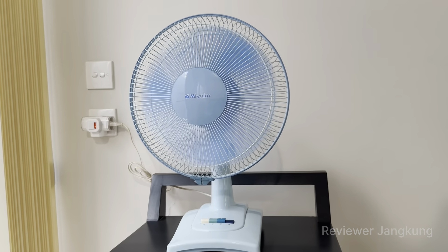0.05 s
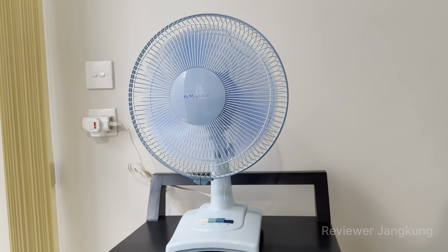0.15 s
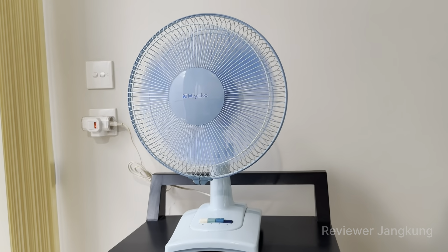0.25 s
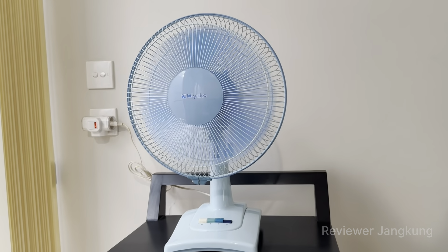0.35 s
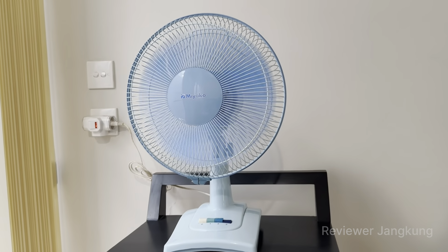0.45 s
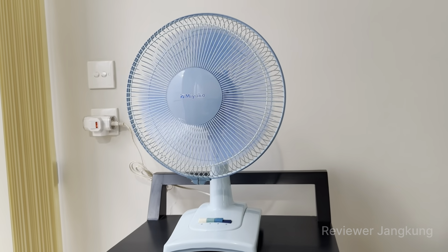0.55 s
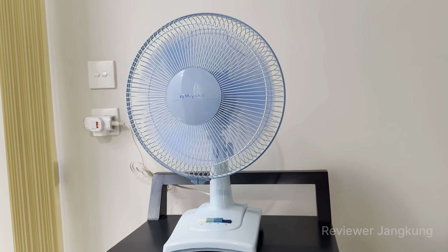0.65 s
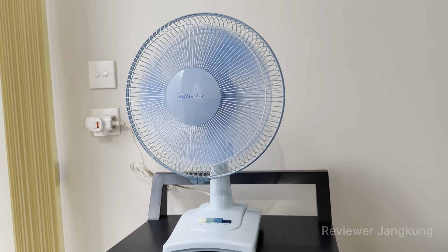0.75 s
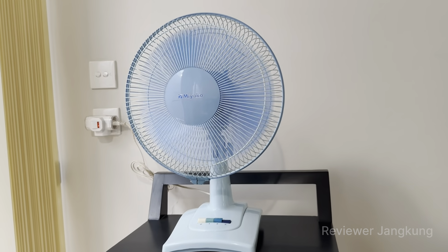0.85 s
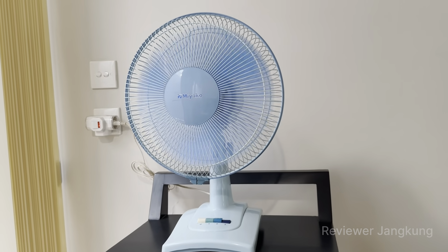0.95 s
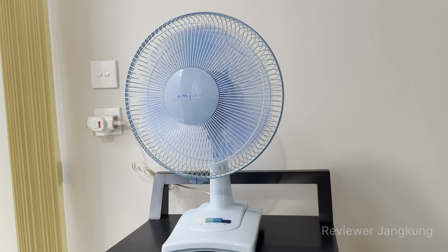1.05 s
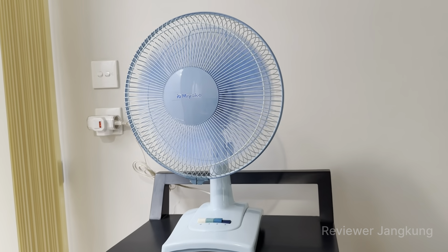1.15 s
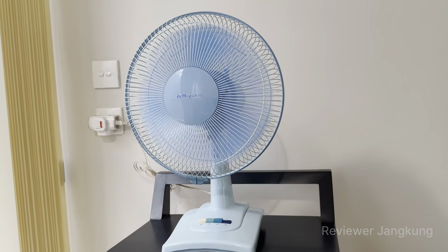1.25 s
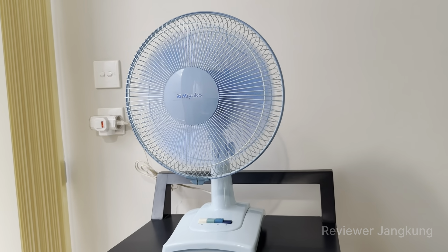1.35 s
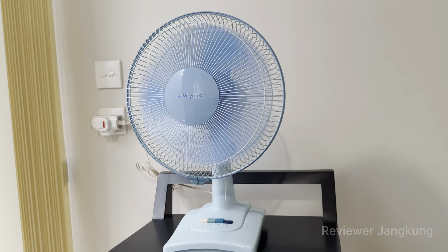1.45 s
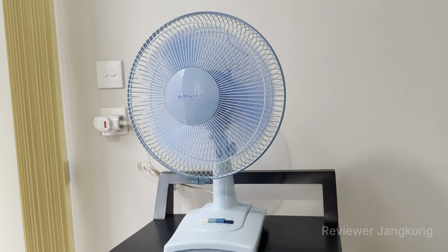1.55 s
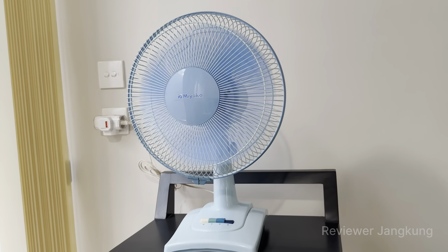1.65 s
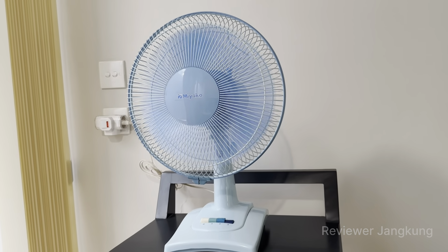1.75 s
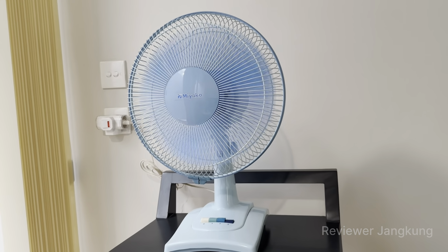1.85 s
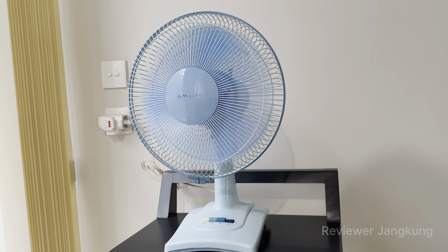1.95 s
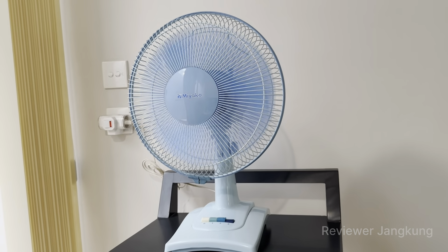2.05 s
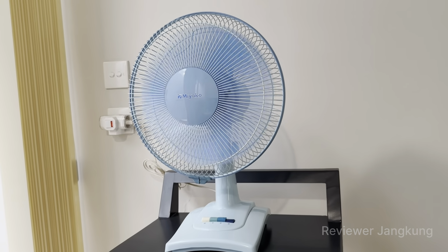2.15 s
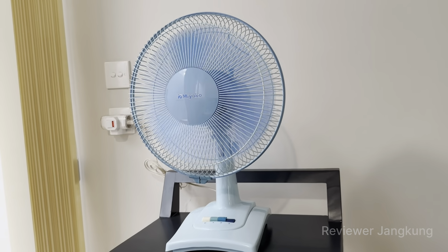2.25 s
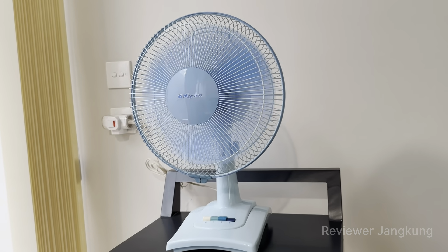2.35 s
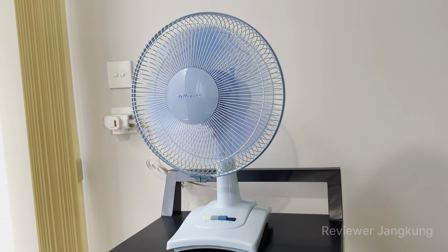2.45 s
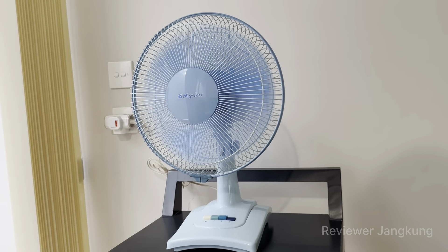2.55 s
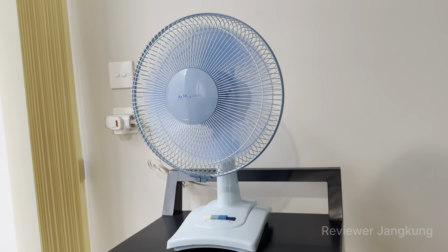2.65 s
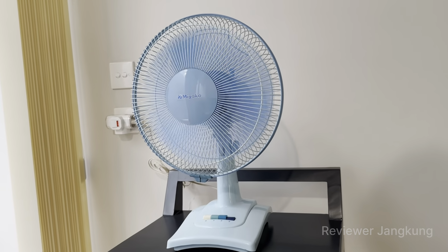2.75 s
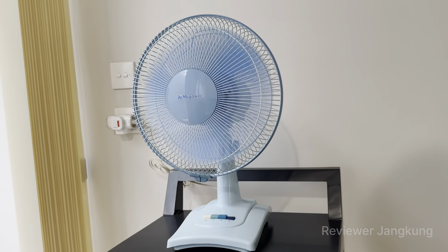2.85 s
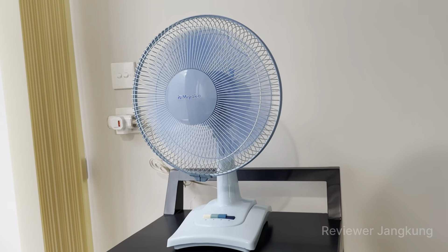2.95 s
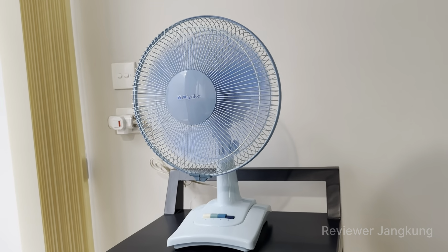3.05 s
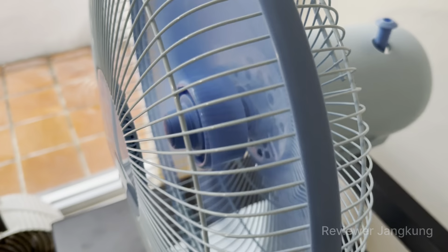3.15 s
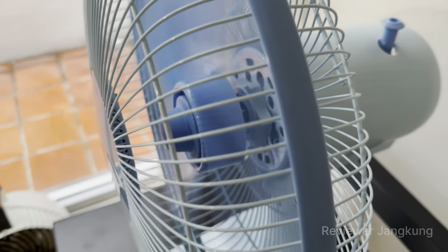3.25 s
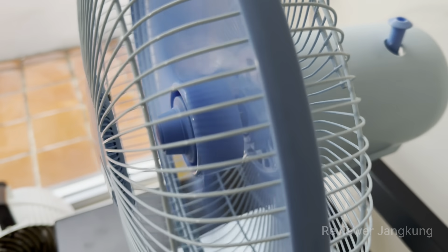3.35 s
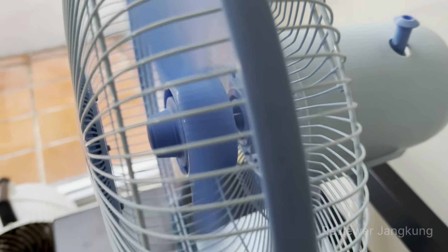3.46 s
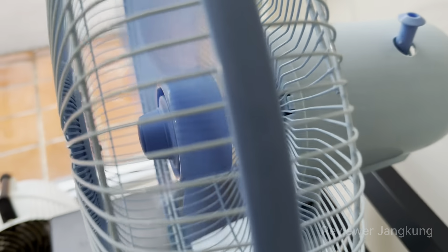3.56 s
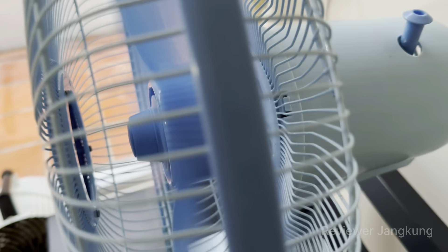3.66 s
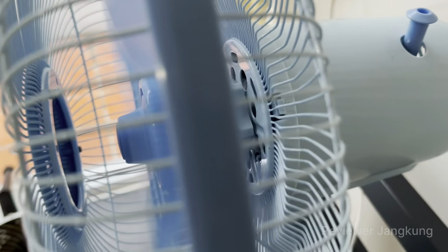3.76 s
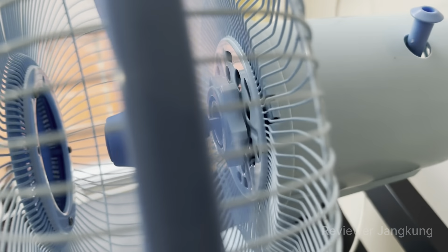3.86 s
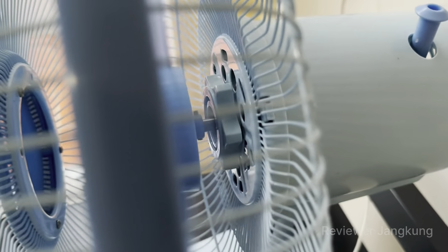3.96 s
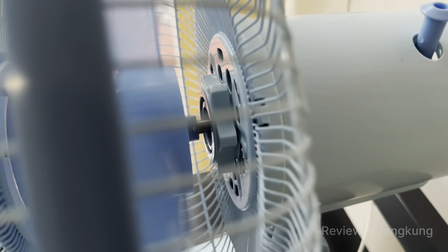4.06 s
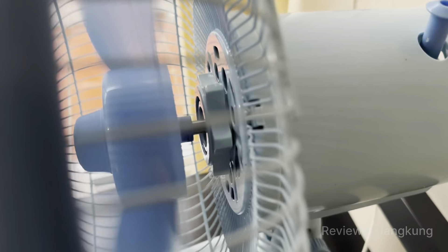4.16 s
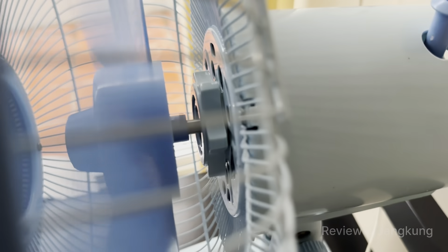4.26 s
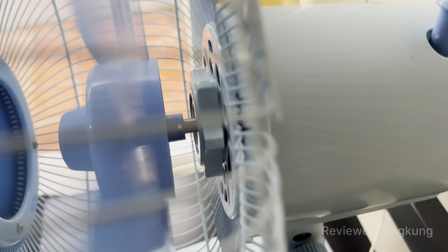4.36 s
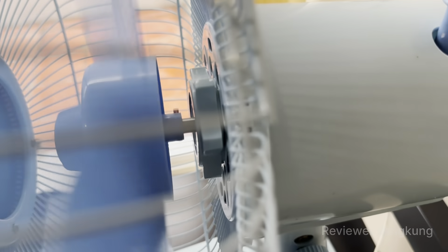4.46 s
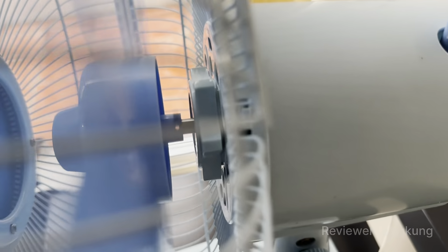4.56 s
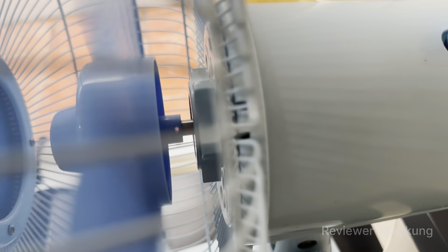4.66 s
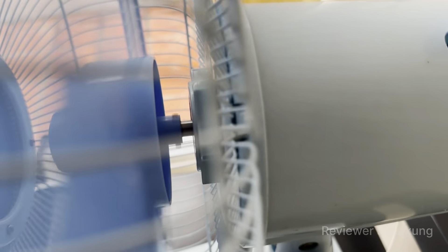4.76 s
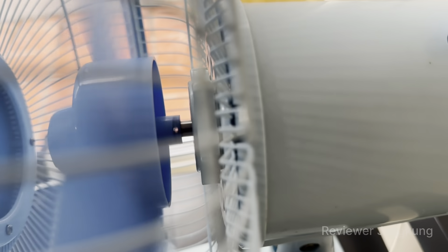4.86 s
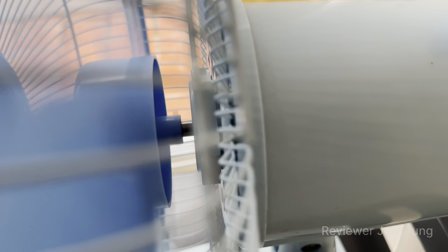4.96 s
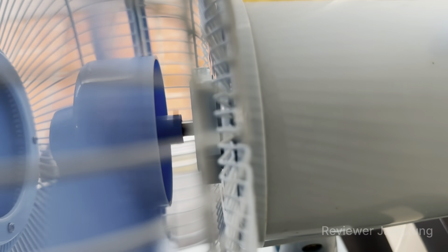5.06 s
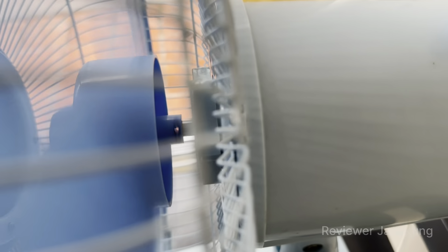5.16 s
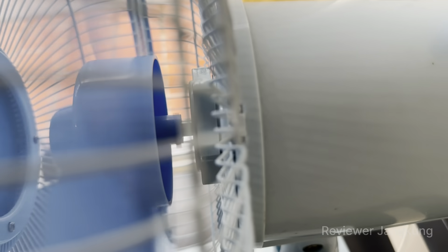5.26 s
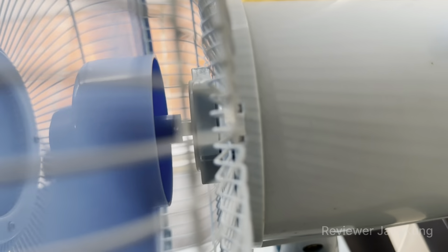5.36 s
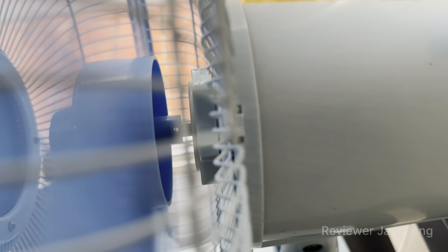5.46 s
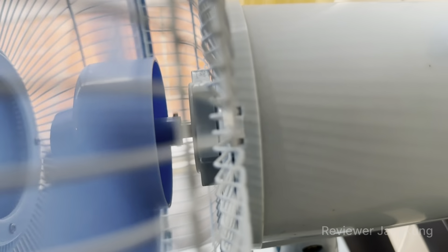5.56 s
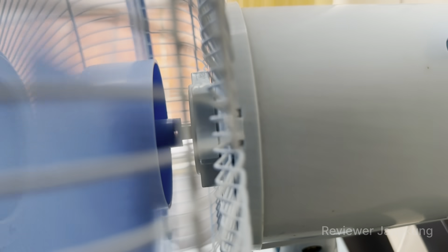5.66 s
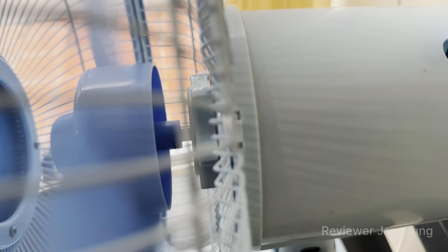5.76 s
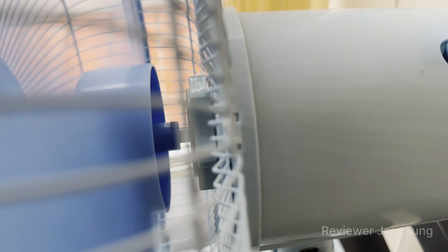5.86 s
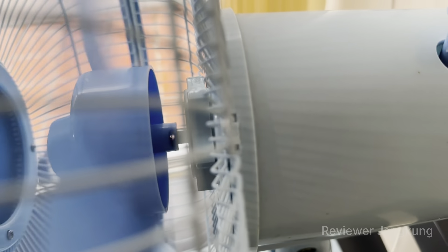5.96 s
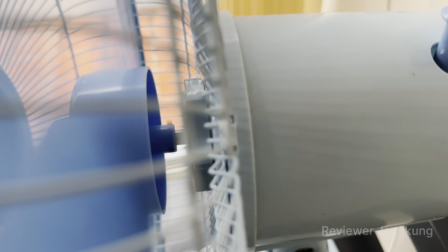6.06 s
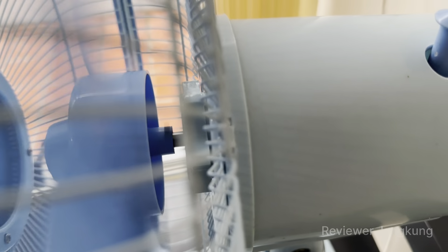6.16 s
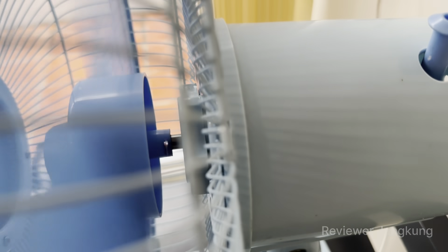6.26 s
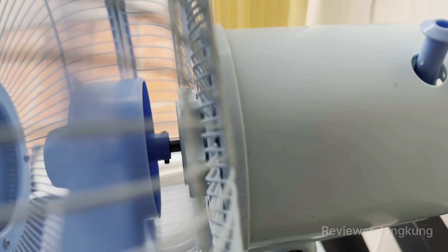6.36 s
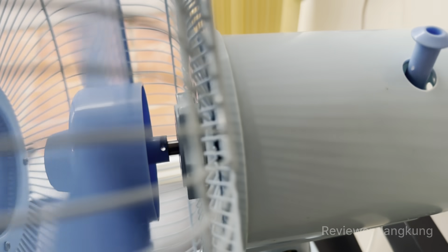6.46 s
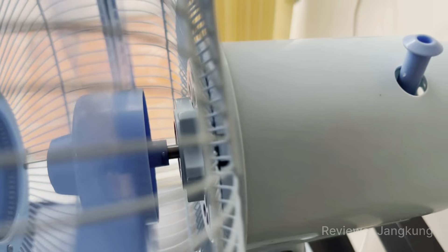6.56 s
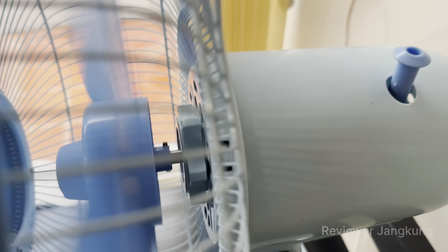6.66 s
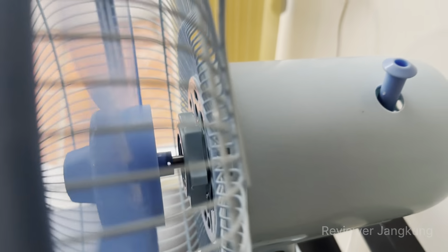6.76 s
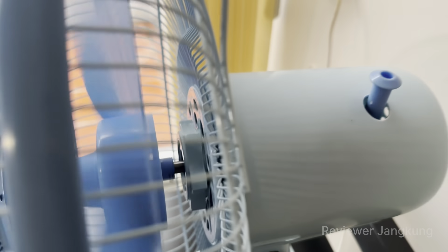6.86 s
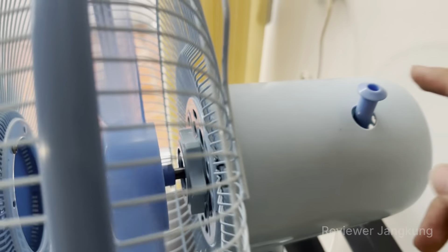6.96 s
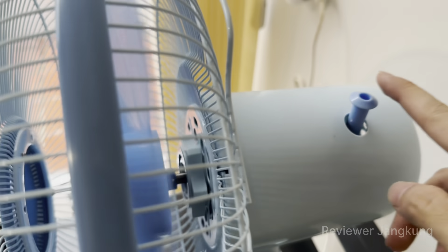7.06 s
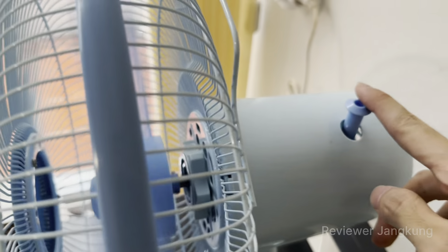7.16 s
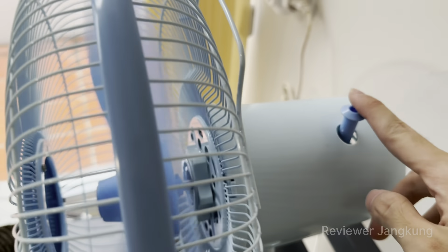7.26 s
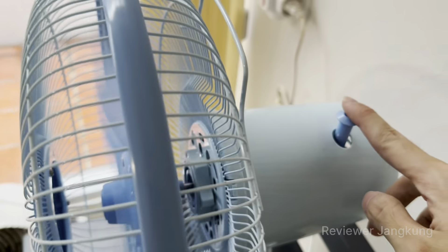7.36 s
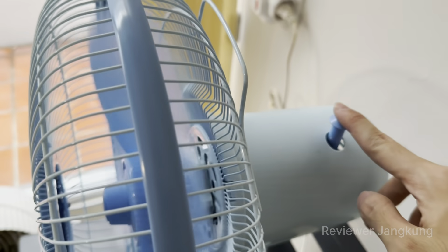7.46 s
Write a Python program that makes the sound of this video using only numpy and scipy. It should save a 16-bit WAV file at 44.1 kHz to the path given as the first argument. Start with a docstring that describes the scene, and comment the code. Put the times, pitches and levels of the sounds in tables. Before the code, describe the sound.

A desk fan turns at nearly constant speed in a small, quiet room. From 0 to about 2.4 seconds the microphone faces the airflow: irregular gusts strike it as clustered low thumps with short fluttering edges and occasional sharper snaps, with rumble between, especially near 1.8 seconds. A soft airy rush lies beneath. The buffeting stops, leaving quiet whir until about 3.2 seconds, when the sound cuts to beside the guard. There the rush is somewhat fuller, and a deep hum near 65 hertz swells quickly until about 4.9 seconds, then holds heavy and steady, with a weaker octave and faint motor whine. At about 6.4 seconds it switches abruptly behind the motor: the hum drops and keeps receding to the end, around 7.5 seconds, while a duller, steady rush of air remains, easing slightly.

```python
"""A small room with a three-bladed desk fan at a nearly steady speed, heard from three places in turn.
In front, eddies of its jet thump and flutter as short noise bursts on the microphone, over an airy rush
of coloured noise. Beside the guard the blade-passing hum, a stack of cosines, swells as the microphone
closes in on the blade tips. Behind the motor the hum recedes and the rush is duller.
Quiet blade harmonics and steady motor tones run underneath throughout."""
import sys
import numpy as np
from scipy import signal
from scipy.fft import rfft, irfft
from scipy.io import wavfile
from scipy.ndimage import uniform_filter1d, map_coordinates

SR = 44100
rng = np.random.default_rng(int(sys.argv[2]) if len(sys.argv) > 2 else 0)


def generate_wav(sig):
    """Save sig (samples, or channels by samples) to the path in sys.argv[1] as 16-bit PCM at SR."""
    pcm = np.round(np.clip(np.atleast_2d(sig).T, -1, 1) * 32767).astype(np.int16)
    wavfile.write(sys.argv[1], SR, pcm)


N = 331191
TIME = np.arange(N) / SR   # seconds
BINS = np.maximum(np.fft.rfftfreq(N, 1 / SR), 1)   # Hz

# when the microphone is beside the fan, then behind it
TO_SIDE_S, TO_REAR_S = 3.178, 6.378
# Speed of the rotor. Each row: time in [s], blade passes in [per s].
BLADE_PASSES = [(3.3, 65.7), (4.5, 65.35), (7.4, 65.25)]

# Gusts hitting the microphone in front. Each row: start in [s], hold in [s], thump level in [dB] and
# flutter level in [dB], both before the eddy scatter and a small trim.
GUSTS = [(0.056, .002, -15.5, -13.5), (0.082, 0.051, -20.5, -18.5), (0.176, 0.0027, -20.5, -31.5),
         (0.224, .008, -32, -51), (0.318, .008, -29, -53), (0.36, 0.0017, -30.5, -29.5),
         (0.54, .002, -27, -50), (0.695, .006, -29.5, -53), (0.799, 0.0039, -11, -23),
         (0.84, .022, -16, -23), (0.885, 0.039, -19.5, -16.5), (0.959, 0.0026, -20.5, -33),
         (1.031, 0.0044, -17.5, -24), (1.073, 0.0016, -20, -31), (1.112, 0.015, -21.5, -23.5),
         (1.287, .002, -24.5, -38), (1.319, .028, -24, -23), (1.38, 0.026, -20.5, -35),
         (1.432, 0.027, -28.5, -26), (1.603, 0.0069, -11.5, -14), (1.718, 0.014, -16.5, -24.5),
         (1.801, 0.031, -21, -31), (1.854, 0.029, -23.5, -26), (1.954, 0.0028, -17, -27.5),
         (1.972, 0.015, -21.5, -22), (2.082, 0.0078, -16.5, -22), (2.153, 0.006, -14, -21.5),
         (2.262, 0.0062, -17.5, -36), (2.299, 0.0095, -16.5, -25.5), (2.349, 0.0032, -19, -21)]
GUST_RISE_DB_PER_S, GUST_FALL_DB_PER_S = 699, 524
# the train of eddies within a gust
EDDIES_PER_GUST, EDDY_GAP_S, EDDY_JITTER_S, EDDY_SPREAD_DB = 4, 0.017, 0.00314, 1.04
FLUTTER_FALL_DB_PER_S = 598   # later eddies are slower and lose their flutter
EDDY_DB_PER_OCTAVE, MIDDLING_FLUTTER_DB = 67, -25   # a harder eddy is faster and sounds higher
THUMP_LAG_S = 0.00297
SNAP_DB, SNAP_GROWTH = -44, 1.56   # snap of a middling eddy; dB of snap per dB of flutter
WAKE_DB, WAKE_FALL_DB_PER_S = -6.5, 280   # rumble that trails a gust, re its thump
# Rumble of the jet between gusts. Each row: time in [s], level before its wander in [dB].
JET_BETWEEN_GUSTS = [(0, -53), (0.28, -33.5), (0.48, -48), (0.62, -42), (0.9, -46), (1.52, -39),
                     (1.85, -21), (2.05, -40.5), (2.42, -36.5)]
JET_WANDER_DB, JET_WANDERS_PER_S, JET_OFF_S = 4, 14, 2.44
# Colour of the jet rumble. Each row: frequency in [Hz], relative density in [dB per Hz].
RUMBLE_COLOUR = [(15, -59), (25, -27), (35, -13), (57, -3.5), (91, 3.5), (179, -15), (275, -15.5),
                 (515, -22), (700, -13), (910, -53), (1540, -120)]

# Air through blades and guard: level in front, and level behind as the microphone backs away.
RUSH_FRONT_DB = -45
RUSH_REAR_DB, RUSH_RECEDE_DB_PER_S = -39.5, 1.9
# Air through blades and guard, beside the fan. Each row: time in [s], rush level in [dB].
RUSH_SIDE_LEVEL = [(3.2, -40.5), (3.9, -39.5), (5.1, -38.5), (5.7, -39), (6.37, -40)]
# Colour of the rush in front, beside the guard, at the blade tips and behind the motor.
# Each row: frequency in [Hz], relative density in [dB per Hz].
FRONT_COLOUR = [(50, -11), (200, -6.5), (320, -8.5), (440, -10.5), (760, -3), (930, -10), (1130, 0.5),
                (1620, -2.5), (2200, -10.5), (3300, -14), (6700, -28), (10500, -37), (15500, -44.5)]
SIDE_COLOUR = [(50, -9), (150, -6.5), (330, -4), (500, -9), (800, -5), (1050, -0.5), (1700, -2.5),
               (2600, -13.5), (3400, -14), (6200, -24.5), (10500, -32.5), (15500, -41)]
TIPS_COLOUR = [(40, 2.5), (130, 9), (250, 0.5), (520, -0.5), (850, -1), (1200, 2), (1700, 0.5),
               (2700, -9.5), (3400, -11.5), (6800, -22.5), (10500, -29), (13000, -33.5), (15500, -33)]
REAR_COLOUR = [(50, -12), (150, 4), (340, -3.5), (570, -6.5), (850, -0.5), (1250, 0), (1600, 3.5),
               (2150, -2), (3000, -13), (4200, -20.5), (6500, -25), (9800, -36.5), (13000, -34),
               (15500, -37)]
# Narrow resonances and dips in the rush at the same four places.
# Each row: centre in [Hz], width in [Hz], lift in [dB].
FRONT_MODES = [(1480, 170, -3), (1574, 78, 5.5), (8800, 360, 4), (10500, 900, 5)]
SIDE_MODES = [(1610, 190, 4), (1300, 150, -2), (3300, 160, 2), (5100, 250, 1.5)]
TIPS_MODES = [(1530, 69, -5.5), (1540, 140, 3.5), (2640, 120, 3.5), (3380, 330, 1.5), (6750, 350, 2.5)]
REAR_MODES = [(1610, 100, -1), (1840, 95, -2.5), (2030, 600, 3.5), (5230, 380, 6), (7100, 400, 1),
              (13100, 700, 5)]

# Blade harmonics that carry through the room. Each row: multiple of the blade-passing rate,
# level in front in [dB] before a 2 dB cut, level beside in [dB] (behind is 5 dB lower).
OVERTONES = [(1, -61.5, -63), (2, -78, -64), (3, -58, -60), (4, -60, -54.5), (5, -59, -54.5), (6, -77, -63),
             (7, -73, -73)]
# Steady motor tones. Each row: frequency in [Hz], level in front, beside and behind in [dB].
MOTOR_TONES = [(200, -60, -66, -66), (300, -60, -59, -62), (959, -66, -55, -64), (6681, -94, -80, -92),
               (8791, -94, -83, -94), (9205, -99, -85, -98), (9663, -99, -86, -98),
               (11493, -106, -91, -100), (14906, -112, -90, -99)]

# Near field of the blades beside the guard, closing in on the tips.
# Each row: time in [s], blade-passing tone in [dB], its octave in [dB].
HUM_SIDE = [(3.22, -39.5, -52.5), (4.21, -17.5, -28.5), (4.43, -14.5, -27), (4.91, -12.5, -24.5),
            (5.18, -13, -27), (5.81, -13, -25.5), (6.3, -14, -30.5), (6.36, -14.5, -29)]
# Unequal blades add multiples of the shaft rate.
# Each row: multiple of the turn rate, level in [dB re blade-passing tone].
IMBALANCE = [(2, -41.5), (4, -24.5), (5, -26), (7, -36)]
# backing away behind the motor; the octave is re the blade-passing tone
HUM_REAR_DB, HUM_RECEDE_DB_PER_S, REAR_OCTAVE_DB = -22.3, 15.5, -17.5
CUTOFF_HZ = 15750


def from_db(db):
    """Decibels to gain."""
    return 10 ** (np.asarray(db) / 20)


def rms_one(x):
    """Scale to unit rms."""
    return x / np.sqrt(np.mean(x ** 2) + 1e-20)


def in_time(rows):
    """The columns of a curve at every sample."""
    seconds, *columns = np.transpose(rows)
    return [np.interp(TIME, seconds, column) for column in columns]


def drift(rate):
    """Smooth random wander of about unit spread, through `rate` random knots a second."""
    knots = rng.standard_normal(1024)
    coarse = map_coordinates(knots, [TIME[::64] * rate], order=3, mode="wrap")
    return coarse.repeat(64)[:N]


def ramp(at, seconds):
    """Rises from 0 to 1 in a straight line around a moment."""
    return np.clip((TIME - at) / seconds + 0.5, 0, 1)


def receding(start_db, fall_db_per_s):
    """A level that sinks steadily as the microphone backs away behind the motor."""
    return start_db - fall_db_per_s * np.maximum(TIME - TO_REAR_S, 0)


def band(x, low_hz, high_hz, order=2):
    """Butterworth band-pass."""
    sos = signal.butter(order, [low_hz, high_hz], "band", fs=SR, output="sos")
    return signal.sosfilt(sos, x)


def coloured(spectrum, modes, unit_band):
    """Noise with a broad colour and a few resonances, of unit rms inside unit_band."""
    hz, db = np.transpose(spectrum)
    shape_db = np.interp(np.log(BINS), np.log(hz), db)
    for centre, width, lift in modes:
        shape_db = shape_db + lift / (1 + (2 * (BINS - centre) / width) ** 2)
    below_first_row = np.minimum(BINS / hz[0], 1) ** 4
    gain = from_db(shape_db) * below_first_row
    inside = (BINS > unit_band[0]) & (BINS < unit_band[1])
    noise = irfft(rfft(rng.standard_normal(N)) * gain, N)
    return noise / np.sqrt(np.mean(gain ** 2 * inside))


def blade_phase(turn):
    """Three blades pass in each turn."""
    return 3 * turn


def gust_db(age_s, hold_s, fall_db_per_s):
    """A gust rises quickly, holds and dies away."""
    rise = GUST_RISE_DB_PER_S * np.maximum(-age_s, 0)
    fall = fall_db_per_s * np.maximum(age_s - hold_s, 0)
    return -rise - fall


def jet_gain():
    """The jet rumbles harder around each gust and weakly between, until it swings off the microphone."""
    wakes_db = [thump_db + WAKE_DB + gust_db(TIME - at, hold_s, WAKE_FALL_DB_PER_S)
                for at, hold_s, thump_db, _ in GUSTS]
    between_db = in_time(JET_BETWEEN_GUSTS)[0] + JET_WANDER_DB * drift(JET_WANDERS_PER_S)
    level_db = np.maximum(np.max(wakes_db, axis=0), between_db)
    return from_db(level_db) * (1 - ramp(JET_OFF_S, 0.054))


def eddies(count):
    """Each gust is a train of eddies, the fastest at its front: rows of (s, thump dB, flutter dB)."""
    for at, hold_s, thump_db, flutter_db in GUSTS:
        for k, (early, thump_luck, flutter_luck) in enumerate(rng.standard_normal((count, 3))):
            jitter_s = min(k, 1) * EDDY_JITTER_S * early   # the first eddy is on time
            age_s = k * EDDY_GAP_S - jitter_s
            eddy_thump_db = thump_db + gust_db(age_s, hold_s, GUST_FALL_DB_PER_S)
            eddy_flutter_db = flutter_db - FLUTTER_FALL_DB_PER_S * age_s
            yield (at + age_s,
                   eddy_thump_db + EDDY_SPREAD_DB * thump_luck,
                   eddy_flutter_db + EDDY_SPREAD_DB * flutter_luck)


def puff(low_hz, high_hz, rise_s, fall_s, order):
    """A brief knot of turbulent pressure, centred on its crest, whose loudest moment has unit rms."""
    t = np.arange(-4096, 4096) / SR
    envelope = np.exp(-np.maximum(-t / rise_s, t / fall_s))
    wave = band(rng.standard_normal(len(t)) * envelope, low_hz, high_hz, order=order)
    power = uniform_filter1d(np.abs(signal.hilbert(wave)) ** 2 / 2, size=130)
    centred = np.roll(wave, len(t) // 2 - np.argmax(power))
    return centred / np.sqrt(power.max())


def add(out, wave, at):
    """Mix a wave in, centred on a moment."""
    where = round(at * SR) - len(wave) // 2 + np.arange(len(wave))
    inside = (where >= 0) & (where < N)
    out[where[inside]] += wave[inside]


def buffeting():
    """Large eddies thump on the microphone port; fast ones break into a flutter, the fastest into a snap."""
    rumble = band(coloured(RUMBLE_COLOUR, [], (40, 300)), low_hz=49, high_hz=287)
    out = jet_gain() * rms_one(rumble)
    for at, thump_db, flutter_db in eddies(EDDIES_PER_GUST):
        hardness_db = flutter_db - MIDDLING_FLUTTER_DB
        speed = 2 ** (hardness_db / EDDY_DB_PER_OCTAVE)
        thump = puff(low_hz=63.9, high_hz=186.5, rise_s=0.003, fall_s=0.0058, order=3)
        flutter = puff(low_hz=218 * speed, high_hz=490 * speed, rise_s=0.0025, fall_s=0.0042, order=4)
        snap = puff(low_hz=530 * speed, high_hz=1020 * speed, rise_s=0.0012, fall_s=0.0017, order=4)
        # the finer scales arrive first, and the snap grows faster than the flutter
        add(out, from_db(thump_db - 0.5) * thump, at + THUMP_LAG_S)
        add(out, from_db(flutter_db - 1.0) * flutter, at - 0.001)
        add(out, from_db(SNAP_DB + SNAP_GROWTH * hardness_db) * snap, at - 0.002)
    # the port leaks the slowest pressure swings away
    return signal.sosfilt(signal.butter(4, 43, "high", fs=SR, output="sos"), out)


def rush(level_db, spectrum, modes):
    """Turbulence shed by the blades and the guard wires, as it sounds from one place."""
    return from_db(level_db) * coloured(spectrum, modes, (1000, 8000))


def reflections(x, strength, count):
    """Weak echoes of either sign from the desk, the housing and the walls ripple the spectrum."""
    out = x.copy()
    lags_s = rng.uniform(0.002, 0.016, count)
    signs = rng.choice([-1, 1], count)
    for lag_s, sign in zip(lags_s, signs):
        out += strength * sign * np.roll(x, round(lag_s * SR))
    return out / np.sqrt(1 + count * strength ** 2)


def air(turn, front, side, rear):
    """The rush at each place, pulsing slightly with every turn and, off the front, with every blade."""
    at_tips = ramp(4.41, 0.58)
    side_db, = in_time(RUSH_SIDE_LEVEL)
    rear_db = receding(RUSH_REAR_DB, RUSH_RECEDE_DB_PER_S)
    # independent noises cross-fade by power
    beside = np.sqrt(1 - at_tips) * rush(side_db, SIDE_COLOUR, SIDE_MODES)
    beside += np.sqrt(at_tips) * rush(side_db, TIPS_COLOUR, TIPS_MODES)
    out = np.sqrt(front) * rush(RUSH_FRONT_DB, FRONT_COLOUR, FRONT_MODES)
    out += np.sqrt(side) * beside
    out += np.sqrt(rear) * rush(rear_db, REAR_COLOUR, REAR_MODES)
    turn_db = 0.3 * np.cos(turn)
    blade_db = 0.46 * (1 - front) * np.cos(blade_phase(turn))
    swish_db = turn_db + blade_db + 0.3 * drift(25)
    return reflections(out, strength=0.061, count=8) * from_db(swish_db)


def tone(phase, gain, waver_db, waver_rad):
    """A line that wavers in level and phase as the air and the room paths shift."""
    level = np.sqrt(2) * gain * from_db(waver_db * drift(5.6))   # gain is rms
    return level * np.cos(phase + waver_rad * drift(6) + rng.uniform(0, 2 * np.pi))


def drone(turn, front, side, rear):
    """Blade harmonics locked to the rotor, with the hum and thin whine of the motor at fixed pitches."""
    out = np.zeros(N)
    for k, far_db, near_db in OVERTONES:
        gain = front * from_db(far_db - 2.0) + side * from_db(near_db) + rear * from_db(near_db - 5)
        out += tone(k * blade_phase(turn), gain, waver_db=2.5, waver_rad=0.29)
    for hz, *place_db in MOTOR_TONES:
        gain = from_db(place_db) @ [front, side, rear]
        out += tone(2 * np.pi * hz * TIME, gain, waver_db=1.0, waver_rad=0.54)
    return out


def blade_hum(turn, first_db, second_db):
    """Each blade sweeps a pressure crest past: three harmonics, plus shaft tones from unequal blades."""
    blade = blade_phase(turn)
    third_db = second_db - 15 + 0.55 * drift(5.5)
    out = np.zeros(N)
    for k, db in enumerate([first_db, second_db, third_db], 1):
        out += from_db(db) * np.cos(k * blade)
    for k, db in IMBALANCE:
        gain = from_db(first_db + db + drift(8.6))
        out += gain * np.cos(k * turn + rng.uniform(0, 2 * np.pi))
    return np.sqrt(2) * out   # levels are rms


def scene():
    """The fan from the front, the side and the rear."""
    passes, = in_time(BLADE_PASSES)
    turn = 2 * np.pi * np.cumsum(passes) / SR / 3   # shaft angle in radians
    # how far the microphone is at each place; the level dips briefly between front and side
    front = 1 - ramp(TO_SIDE_S - 0.005, 0.003)
    rear = ramp(TO_REAR_S, 0.0058)
    side = ramp(TO_SIDE_S + 0.008, 0.022) - rear
    sound = front * buffeting()
    sound += air(turn, front, side, rear)
    sound += drone(turn, front, side, rear)
    sound += side * blade_hum(turn, *in_time(HUM_SIDE))
    rear_db = receding(HUM_REAR_DB, HUM_RECEDE_DB_PER_S)
    sound += rear * blade_hum(turn, rear_db, rear_db + REAR_OCTAVE_DB)
    return sound[None]


def record(dry):
    """The top is cut steeply by an elliptic low-pass."""
    sos = signal.ellip(10, 0.1, 80, CUTOFF_HZ, fs=SR, output="sos")   # order, ripple dB, stop-band dB
    return signal.sosfilt(sos, dry)


dry = scene()
out = record(dry)
generate_wav(out)
```